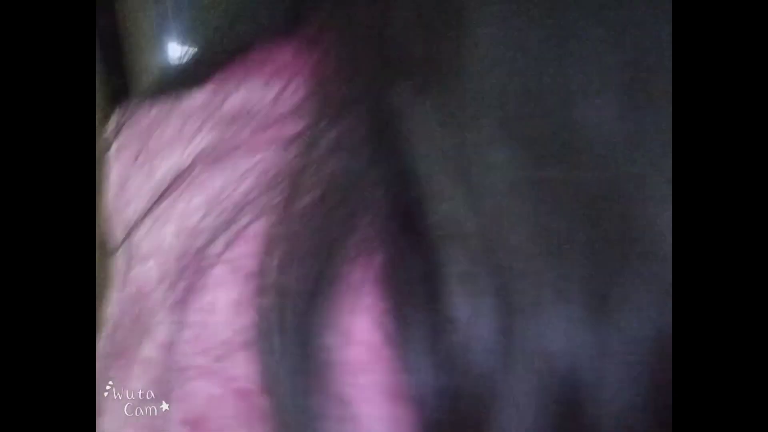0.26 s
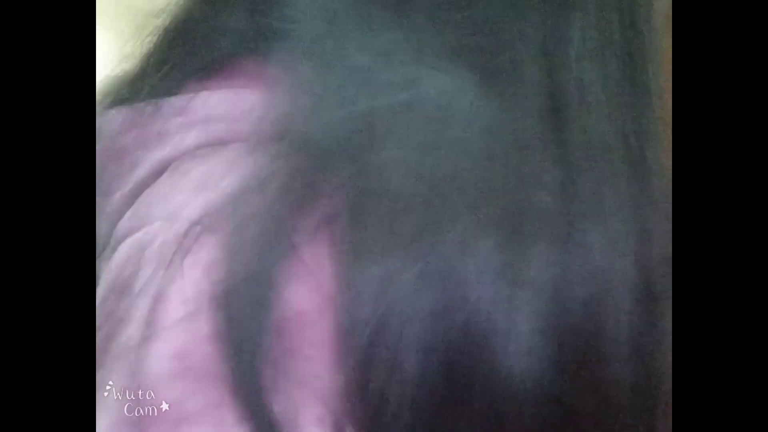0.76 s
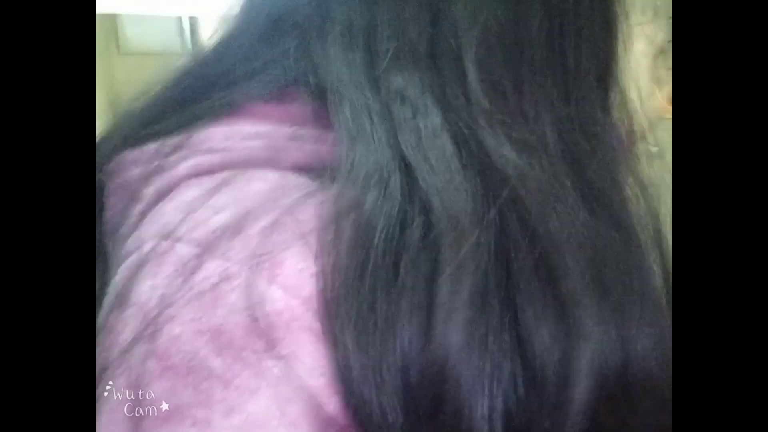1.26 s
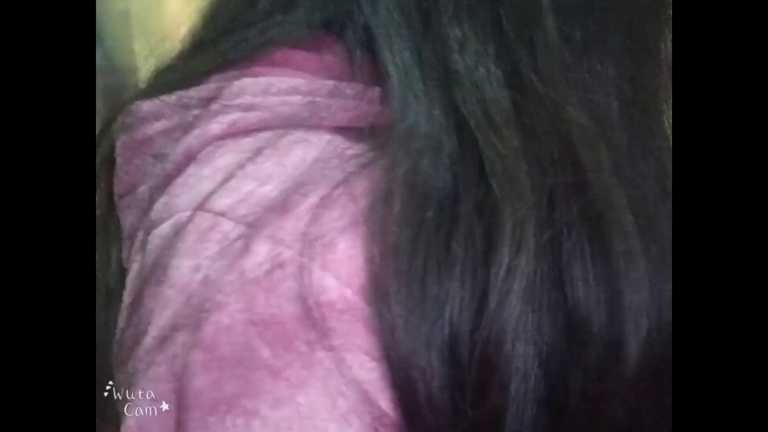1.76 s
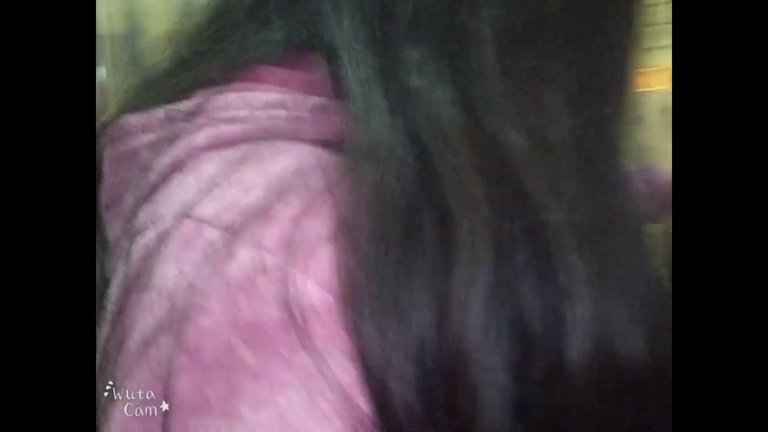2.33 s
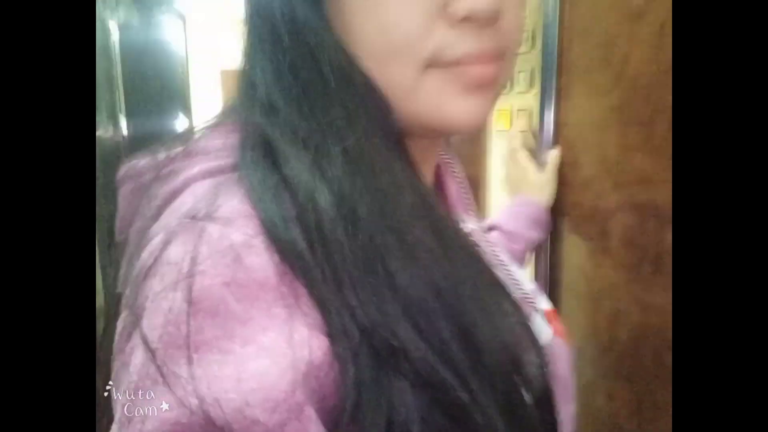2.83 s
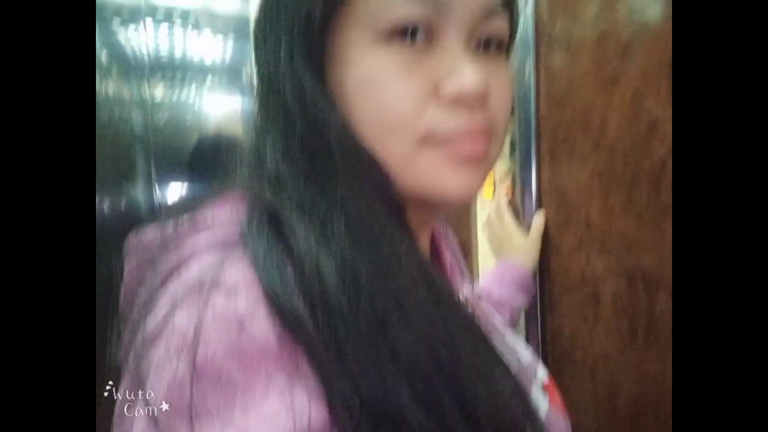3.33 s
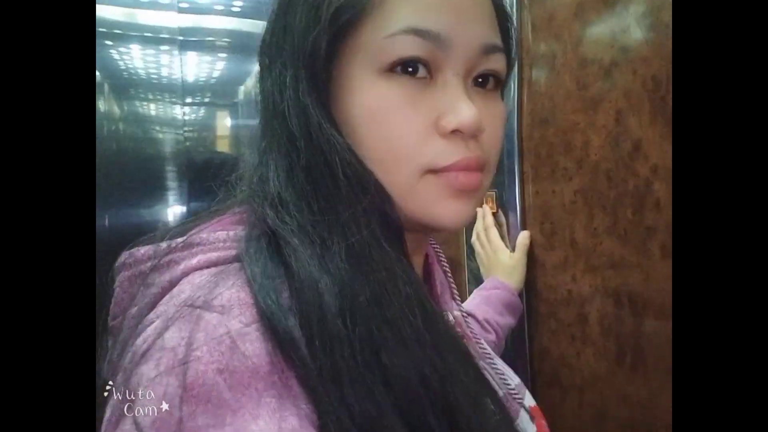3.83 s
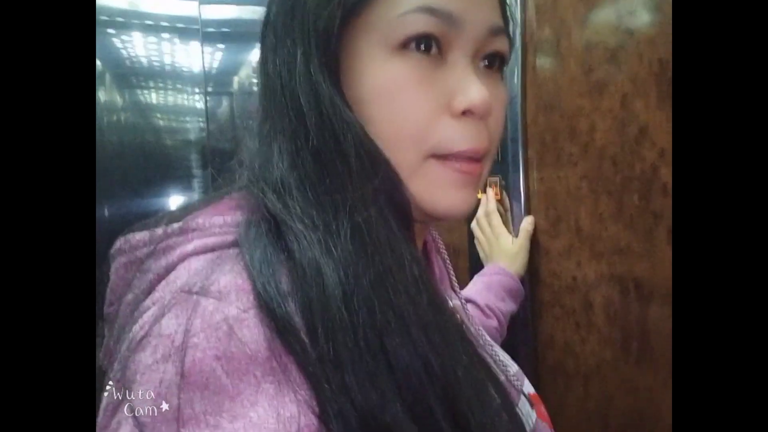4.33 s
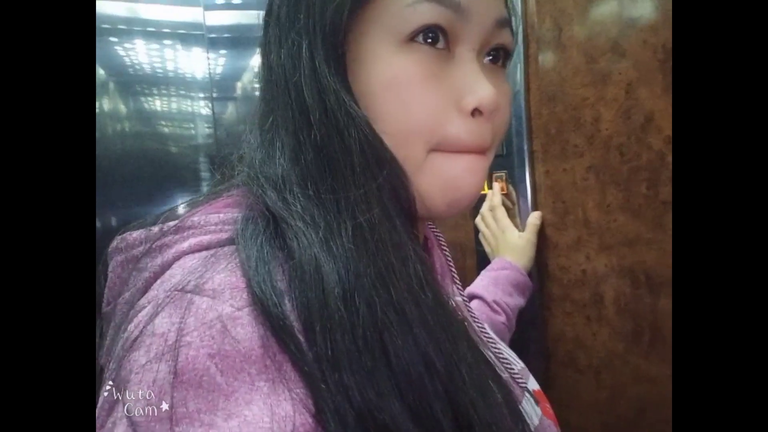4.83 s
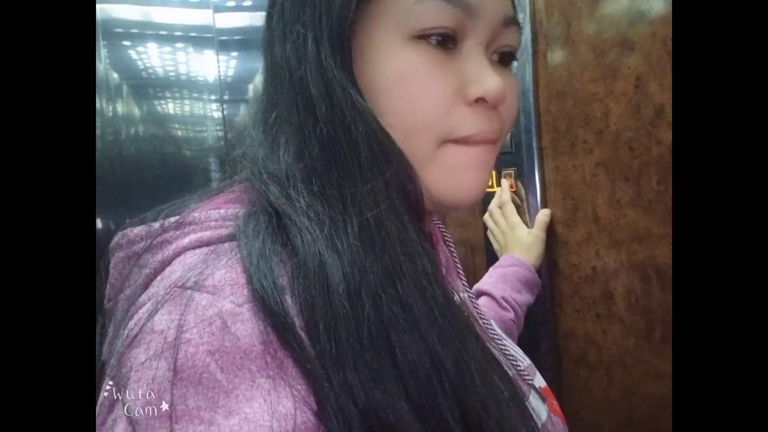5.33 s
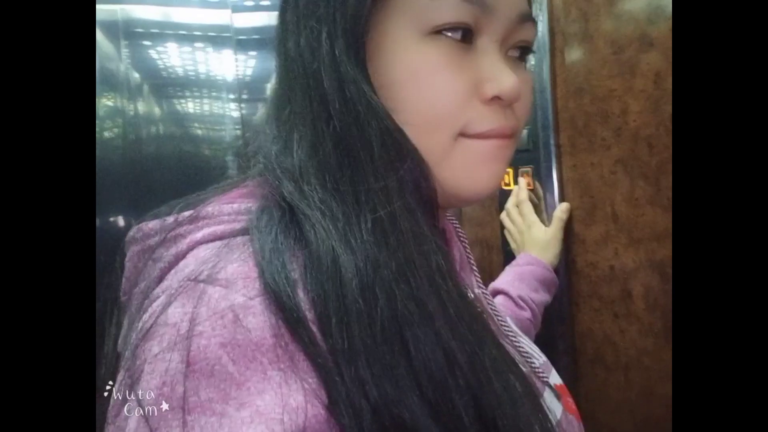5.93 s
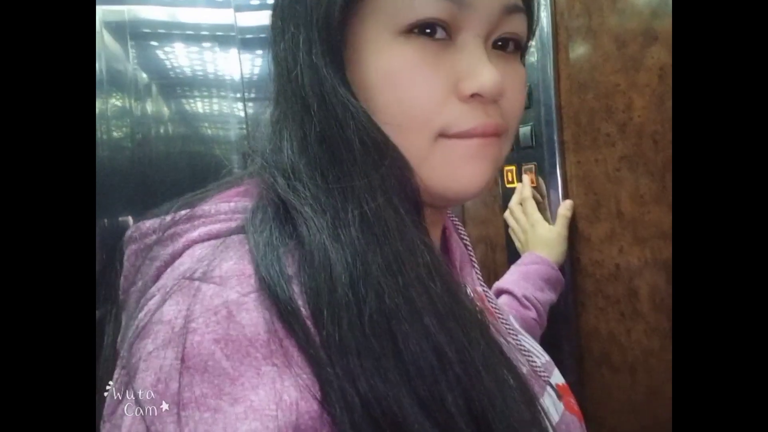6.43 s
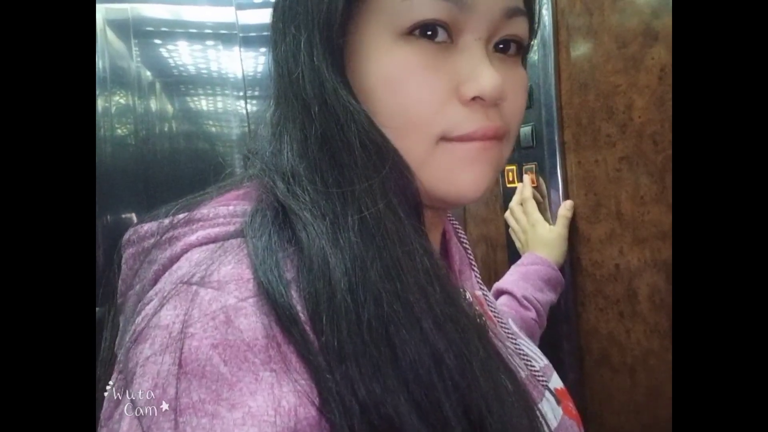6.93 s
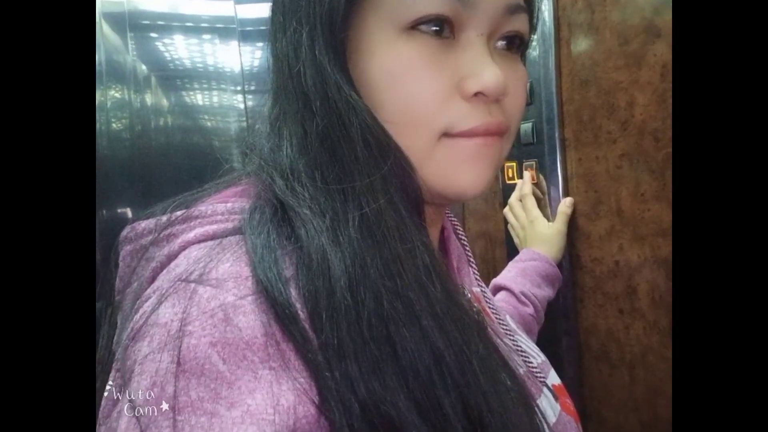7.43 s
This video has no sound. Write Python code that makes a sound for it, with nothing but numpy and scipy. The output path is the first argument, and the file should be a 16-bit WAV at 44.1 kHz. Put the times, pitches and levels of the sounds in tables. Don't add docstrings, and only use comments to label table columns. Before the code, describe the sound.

A ceiling fan drones with low electrical hum inside a small steel lift car, with faint airy hiss through the open doorway. Close, soft thuds and loose rattles come first, two of them heavy. After a short lull the door rolls shut with a growing rumble, slows, and lands in several clunks with a rubbery scuff. Only the fan hum remains. A handheld phone's level wavers slightly.

```python
import sys
import numpy as np
from scipy import signal
from scipy.fft import rfft, irfft
from scipy.io import wavfile
from scipy.ndimage import uniform_filter1d

SR = 44100
rng = np.random.default_rng(int(sys.argv[2]) if len(sys.argv) > 2 else 0)


def invert_db(x):
    u = np.asarray(x, float) / 20
    return 10 ** u


def dump(signal):
    limited = np.clip(np.atleast_2d(signal).T, -1, 1)
    pcm = np.round(limited * 32767).astype(np.int16)
    wavfile.write(sys.argv[1], SR, pcm)


N = 338247
TIME = np.arange(N) / SR
SHAFT_HZ = 42.46

# shaft_multiple [ratio], level_db [dB]
BLADE_TONES = [(4, -18), (7, -1), (8, -19), (12, -19), (15, -16.5)]
# pitch_hz [Hz], level_db [dB]
MAINS_HUM = [(100.1, -1.5)]
# pitch_hz [Hz], level_db [dB per Hz]
AIR_COLOUR = [(25, -36), (45, -14), (70, -1.5), (130, -3), (1050, -11.5), (1300, -19), (4300, -27),
              (6500, -33.5), (8100, -46.5), (9250, -48), (9320, -52), (11950, -54.5), (12050, -42.5),
              (15500, -31.5)]
# pitch_hz [Hz], width_hz [Hz], level_db [dB]
DUCT_RESONANCES = [(49.4, 4.7, -45.5), (164.7, 13.5, -46), (411, 32, -51.5), (656, 10.7, -53.5),
                   (650, 82, -69), (886, 11, -59.5), (1155, 14, -64), (1595, 56, -63), (2230, 330, -58.5),
                   (3420, 440, -62), (4150, 230, -64), (14900, 500, -69.5)]
# start_s [s], gain_db [dB],
# hum_place_db [dB] in the standing wave of the hum, nearness_db [dB] to the fan blades
PHONE_MOVES = [(0, 2, 4, -14), (.3, 0, -22, -6.5), (.55, -0.5, -0.5, -0.5), (1.15, 0, -2, -9.5),
               (1.6, -3.5, 3.5, -3.5), (2.05, -2.5, 5, -2.5), (2.7, -2, -2, 2.5), (3, -1.5, 4.5, -1),
               (3.5, 1, 0, 5), (3.9, 0.5, 2, -0.5), (4.5, 0.5, 1.5, 0), (5.05, 1.5, -1, 2),
               (5.3, -1.5, -1, 0.5), (6.3, -1.5, -0.5, 1.5), (6.75, 1.5, -1, 2.5), (7.1, 1.5, -0.5, 0.5),
               (7.67, 1, 0.5, 3)]
# start_s [s], level_db [dB]
HALL_LEVEL = [(0, -51), (.7, -58), (1.55, -59), (1.62, -66), (1.78, -74), (1.93, -61.5), (3.5, -57.5),
              (4.7, -61), (4.95, -51), (5.1, -61), (5.3, -71)]
# pitch_hz [Hz], level_db [dB per Hz]
HISS_COLOUR = [(3000, -35), (5500, 10.5), (8000, 4), (10000, 7.5), (12500, 11.5), (15500, 12)]
# pitch_hz [Hz], width_hz [Hz], level_db [dB]
CAR_BOOM = [(54.3, 16.5, -2), (75.9, 17.2, 9.5)]
# pitch_hz [Hz], width_hz [Hz], level_db [dB]
CROSS_MODES = [(158.6, 16.5, 1.5), (124.4, 53, 3), (210, 83, -4.5)]
# pitch_hz [Hz], width_hz [Hz], level_db [dB]
DOOR_PANELS = [(231.5, 54, -26), (332, 123, 19.5), (393, 87, 5.5), (454, 27, 11), (507, 142, 14.5),
               (607, 51, -4), (637, 66, -6)]
# pitch_hz [Hz], width_hz [Hz], level_db [dB]
DOOR_ROLLERS = [(823, 194, 10), (912, 37, -6), (1074, 105, 4.5), (1223, 320, 2.5)]
# start_s [s], level_db [dB]
ROLL_EFFORT = [
    (2.5, -56),
    (2.8, -39.5),
    (2.97, -35.5),
    (3.25, -31.5),
    (3.55, -28),
    (3.75, -31),
    (3.85, -35),
    (4.4, -40),
    (4.72, -49),
]
# start_s [s], level_db [dB], length_s [s],
# tilt_db [dB gained per step up from cross mode to rollers], boom_db [dB]
DOOR_JOLTS = [(0, -38, 0.084, -2, -55), (0.248, -48, .05, 1, -33), (0.586, -41.5, 0.075, 10.5, -30),
              (0.663, -41, 0.084, -7, -27), (.8, -52, .04, -8, -39), (1.192, -41, 0.058, -6, -36),
              (1.258, -40, .02, -7, -40), (1.757, -38, .03, 4, -35), (1.843, -42, 0.045, -14.5, -37),
              (2.043, -57, .05, -4, -36), (2.175, -50, .04, -7, -38), (3.044, -38, .04, 0, -38),
              (3.316, -52, .05, -16, -42), (3.43, -46.5, 0.077, -18, -38), (3.57, -45.5, .06, 6, -31.5),
              (3.9, -37, 0.04, 3, -40), (3.987, -54, 0.026, 0, -37), (4.256, -38, 0.044, 12, -36),
              (4.729, -27.5, .1, 2, -25.5), (4.929, -24.5, 0.042, 3, -29), (5.077, -24.5, 0.054, -4, -29)]
# start_s [s], bright_peak_db [dB], dull_minus_bright_db [dB], rub_s [s]
RUBS = [(0.0454, -31, 2.5, 0.01), (0.1401, -43, 3, .015), (0.4394, -39, -9, 0.012), (0.5826, -33, 5, .025),
        (0.6754, -42.5, 16.5, .025), (0.8644, -32.5, -3, 0.013), (1.1977, -40, 8, .03),
        (1.266, -33, 9.5, 0.0063), (1.5498, -36.5, -5, 0.011), (1.757, -32.5, 4, 0.024),
        (1.813, -27, 7, 0.014), (2.1191, -42, 9.5, .013), (2.151, -34.5, -7, 0.01), (2.4994, -43, -3, .016),
        (2.7794, -46, 6, .017), (3.357, -38, -10, .018), (3.4234, -35, -1, .02), (3.5528, -30, 3.5, 0.025),
        (3.675, -32, 3.5, 0.019), (3.8594, -40.5, 6, .018), (4.1994, -44, -8, .017),
        (4.2644, -36, -7, 0.026), (4.3844, -37, 5.5, 0.028), (4.727, -31, -4, 0.036),
        (4.803, -32, 1, 0.038), (4.9282, -30.5, -3, 0.035)]
# pitch_hz [Hz], level_db [dB per Hz]
BRIGHT_COLOUR = [(3500, 0), (5500, 3.5), (7500, -3), (11000, -2), (13500, 1), (15500, -10)]
# pitch_hz [Hz], level_db [dB per Hz]
DULL_COLOUR = [(400, 29), (1000, 15), (2200, 15.5), (4000, 6), (6000, -78)]
# start_s [s], pitch_hz [Hz], width_hz [Hz], level_db [dB], t60_s [s]
SMALL_PARTS = [(.14, 5800, 500, -50, .08), (.585, 900, 240, -39, .25), (.682, 2000, 300, -38, .1),
               (.682, 4000, 900, -44, .08), (.855, 13000, 2500, -50, .25), (1.198, 6800, 300, -55, .2),
               (1.756, 2100, 900, -36, .05), (1.813, 1950, 300, -35, .08), (1.813, 4500, 500, -40, .07),
               (1.818, 1150, 130, -34, .25), (2.115, 13200, 2000, -50, .06), (2.149, 1400, 260, -37, .07),
               (4.249, 9000, 4000, -55, .03), (4.366, 14000, 1500, -47, .04), (4.806, 8400, 300, -47, .2),
               (4.806, 4800, 500, -46, .1), (4.925, 6300, 300, -45, .22), (4.925, 9800, 600, -48, .1)]
# start_s [s], peak_db [dB], lowest_mode_hz [Hz],
# push_s [s], panels_db [dB]
BLOWS = [
    (0.152, -18, 85, .006, -18),
    (.239, -15.5, 75.6, 0.0035, -18),
    (.66, -17, 81, 0.012, -10),
    (1.2635, -2.5, 92.8, 0.0094, -23),
    (1.7567, -5.5, 88.5, 0.01, -12.5),
    (1.814, -22.5, 92.4, 0.003, -1),
    (.675, -22, 45, .02, -40),
    (4.8, -18, 42, .02, -40),
    (6.9, -20, 48.6, .04, -40),
]
# pitch_hz [Hz], level_db [dB], t60_s [s]
WALL_MODES = [(171.6, 2, 0.31), (240.4, 4, 0.18), (281.3, 0, 0.13), (388, 3, 0.082), (430, -9, 0.18),
              (763, -16, 0.3), (1026, -21, .15), (1300, -16, 0.065), (1910, -24, 0.074)]
# start_s [s], press_s [s]
DOOR_LANDINGS = [
    (4.74, 0.07),
    (4.95, 0.092),
    (5.078, 0.072),
    (5.12, .055),
]
# pitch_hz [Hz], level_db [dB], t60_s [s]
LEAF_MODES = [(86, -22, 0.39), (145, -27, 0.23), (258, -30.5, .12), (298.8, -31.5, 0.31), (584, -28, 0.45)]
# pitch_hz [Hz], level_db [dB], t60_s [s]
LATCH_MODES = [(306.7, -30, 0.32), (401, -37.5, 0.18)]
# pitch_hz [Hz], level_db [dB], t60_s [s]
FRAME_MODES = [(121.4, -29, .3), (237.4, -21.5, 0.54), (497, -32, 0.38), (580, -37, .2), (695, -41, .23),
               (836, -36, 0.13), (888, -37.5, .3), (1123, -45.5, .17), (1970, -51.5, 0.35)]
# pitch_hz [Hz], level_db [dB], t60_s [s]
SILL_MODES = [(160.5, -24.5, 0.35), (292, -25, 0.54)]
# pitch_hz [Hz], width_hz [Hz], level_db [dB]
SEAL_RESONANCES = [(9270, 1900, 7), (7540, 530, -10), (4700, 310, -6.5), (3060, 920, -14),
                   (2370, 780, -5.5), (12000, 4000, -1)]
# pitch_hz [Hz], width_hz [Hz], depth [0-1]
PORT_DIPS = [(1810, 71, 0.86)]


def unit(x):
    return x / np.sqrt(np.mean(x ** 2))


def curve(table):
    start_s, *columns = np.transpose(table)
    return [invert_db(np.interp(TIME, start_s, level_db, -120, -120)) for level_db in columns]


def coloured(points):
    pitch_hz, level_db = np.transpose(points)
    bins = np.log(np.arange(N // 2 + 1) * SR / N + 1)
    shape = invert_db(np.interp(bins, np.log(pitch_hz), level_db, -90, -90))
    return unit(irfft(rfft(rng.standard_normal(N)) * shape, N))


def resonate(x, peaks):
    total = 0
    for pitch_hz, width_hz, level_db in peaks:
        peak = signal.iirpeak(pitch_hz, pitch_hz / width_hz / 1.5, SR)
        once = signal.lfilter(*peak, x)
        total = total + invert_db(level_db) * unit(signal.lfilter(*peak, once))
    return total


def walk(rate):
    hold = int(SR / rate)
    steps = np.repeat(rng.standard_normal(N // hold + 1), hold)
    return unit(uniform_filter1d(uniform_filter1d(steps, hold), hold)[:N])


def tones(lines, wander_hz, flutter_db):
    total = 0
    for pitch_hz, level_db in lines:
        level = np.sqrt(2) * invert_db(level_db + flutter_db * walk(6.8))
        phase = 2 * np.pi * np.cumsum(pitch_hz + wander_hz * walk(2.996)) / SR
        total = total + level * np.sin(phase + 9 * rng.random())
    return total


def burst(t, rise, hold, t60):
    return (1 - np.exp(-t / abs(rise))) * 1000. ** (-np.maximum(t - hold, 0) / t60)


def air_rush():
    flicker = invert_db(.7 * walk(9))
    rush = invert_db(11) * flicker * coloured(AIR_COLOUR)
    duct = invert_db(51.5) * resonate(rng.standard_normal(N), DUCT_RESONANCES)
    housing = tones([(6 * SHAFT_HZ, 11)], wander_hz=.6, flutter_db=1.3)
    return invert_db(-52) * (rush + duct + housing)


def mains_hum():
    return invert_db(-31.5) * tones(MAINS_HUM, wander_hz=.7, flutter_db=.6)


def blade_tones():
    lines = [(multiple * SHAFT_HZ, level_db) for multiple, level_db in BLADE_TONES]
    return invert_db(-38) * tones(lines, wander_hz=.6, flutter_db=.8)


def fan_whine():
    whine = tones([(14 * SHAFT_HZ, 0)], wander_hz=.9, flutter_db=1.3)
    return invert_db(-45.5 + np.interp(TIME, (2, 4.4), (-13.5, 0))) * whine


def fan():
    gain, hum_place, nearness = curve(PHONE_MOVES)
    hum = hum_place * mains_hum()
    blades = nearness * blade_tones()
    whine = nearness ** 1.4 * fan_whine()
    return gain * (air_rush() + hum + blades + whine)


def hall():
    return curve(HALL_LEVEL)[0] * invert_db(-1.5 + 1.5 * walk(12)) * coloured(HISS_COLOUR)


def car(x):
    t60_s, wet_db = .2, -14
    t = TIME[:SR // 3]
    band = signal.butter(2, [800, 4000], "band", fs=SR, output="sos")
    echoes = signal.sosfilt(band, rng.standard_normal(len(t))) * 1000. ** (-t / t60_s)
    return x + invert_db(wet_db) * signal.fftconvolve(x, echoes / np.linalg.norm(echoes))[:N]


def door():
    roll_shares_db = np.array((-9, -7.5, -2, -13.5))
    jolt_shares_db = np.array((-0.5, -1, -14.5))
    jolt_rise_s, jolt_t60_s = 0.019, 0.44
    sway_db, shut_s = -43.5, 5.3
    bumps = invert_db(1.3 * walk(30))
    bodies = (CAR_BOOM, CROSS_MODES, DOOR_PANELS, DOOR_ROLLERS)
    shaken = [unit(resonate(bumps * rng.standard_normal(N), body)) for body in bodies]
    gains = invert_db(roll_shares_db)[:, None] * curve(ROLL_EFFORT)[0]
    gains[0] += invert_db(sway_db) * (TIME < shut_s)
    t = TIME[:SR // 2]
    for start_s, level_db, length_s, tilt_db, boom_db in DOOR_JOLTS:
        upper_db = level_db + jolt_shares_db + tilt_db * np.array([-1, 0, 1])
        shares = invert_db(np.append(boom_db, upper_db))
        at = int(start_s * SR)
        gains[:, at:at + len(t)] += shares[:, None] * burst(t, jolt_rise_s, length_s, jolt_t60_s)
    return np.sum(gains * shaken, axis=0)


def rubs():
    fade_per_rub = 11.1
    out, t = np.zeros(N), TIME[:SR // 3]
    bright, dull = coloured(BRIGHT_COLOUR), coloured(DULL_COLOUR)
    for start_s, bright_db, dull_db, rub_s in RUBS:
        at = slice(int(start_s * SR), int(start_s * SR) + len(t))
        scuff = bright[at] + invert_db(dull_db + 3.5) * dull[at]
        out[at] += invert_db(bright_db - 15.5) * burst(t, 0.00047, rub_s, fade_per_rub * rub_s) * scuff
    return out


def pings():
    out, t = np.zeros(N), TIME[:SR // 3]
    for start_s, pitch_hz, width_hz, level_db, t60_s in SMALL_PARTS:
        at = slice(int(start_s * SR), int(start_s * SR) + len(t))
        ring = resonate(rng.standard_normal(len(t)), [(pitch_hz, width_hz, 0)])
        out[at] += invert_db(level_db) * burst(t, .0015, .006, t60_s) * ring
    return out


def knocks():
    car_t60_s = 0.27
    out, t = np.zeros(N), TIME[:SR // 2]
    chances = rng.standard_normal((len(BLOWS), len(WALL_MODES)))
    for (start_s, peak_db, lowest_hz, push_s, panels_db), chance in zip(BLOWS, chances):
        modes = [(lowest_hz, 0, car_t60_s)]
        for (pitch_hz, level_db, t60_s), c in zip(WALL_MODES, chance):
            modes.append((pitch_hz * (1 + 0.0227 * c), panels_db + level_db + 2 * c, t60_s))
        ring = sum(invert_db(db) * np.sin(2 * np.pi * hz * t) * 1000. ** (-t / t60_s) for hz, db, t60_s in modes)
        at = int(start_s * SR)
        out[at:at + len(t)] += invert_db(peak_db) * ring * (1 - np.exp(-t / abs(push_s))) ** 2
    return out


def landings():
    out, t = np.zeros(N), TIME[:SR // 2]
    wobble = invert_db(2.0 * walk(45))
    parts = (LEAF_MODES, LATCH_MODES, FRAME_MODES, SILL_MODES)
    for (start_s, press_s), part in zip(DOOR_LANDINGS, parts):
        at = int(start_s * SR)
        for pitch_hz, level_db, t60_s in part:
            skip = int(rng.random() * (N - len(t)))
            ring = np.sqrt(2) * np.sin(2 * np.pi * (pitch_hz * t + rng.random()))
            ring = ring * wobble[skip:skip + len(t)]
            out[at:at + len(t)] += invert_db(level_db) * burst(t, 0.003, press_s, t60_s) * ring
    return out


def seal():
    start_s, level_db, rise_s, rub_s, t60_s = 5.064, -31.5, 0.012, 0.056, .22
    press = burst(np.maximum(TIME - start_s, 0), rise_s, rub_s, t60_s)
    grain = invert_db(0.61 * walk(150)) * rng.standard_normal(N)
    return invert_db(level_db) * press * unit(resonate(grain, SEAL_RESONANCES))


def scene():
    steady = car(fan() + hall())
    close = door() + rubs() + pings() + knocks() + landings() + seal()
    return (steady + close)[None]


def band_limit(x):
    return signal.sosfilt(signal.butter(12, 16410, fs=SR, output="sos"), x)


def record(dry):
    for pitch_hz, width_hz, depth in PORT_DIPS:
        port = signal.iirpeak(pitch_hz, pitch_hz / width_hz, SR)
        dry = dry - min(depth, 1) * signal.lfilter(*port, dry)
    top_cut = signal.ellip(12, .3, 70, 15480, fs=SR, output="sos")
    bass_cut = signal.butter(2, 35, "high", fs=SR, output="sos")
    mix = signal.sosfilt(bass_cut, signal.sosfilt(top_cut, dry))
    return band_limit(mix)


dry = scene()
out = record(dry)
dump(out)
```